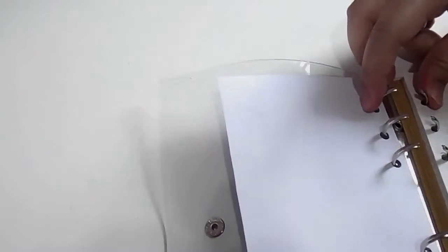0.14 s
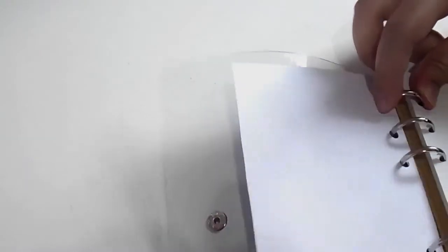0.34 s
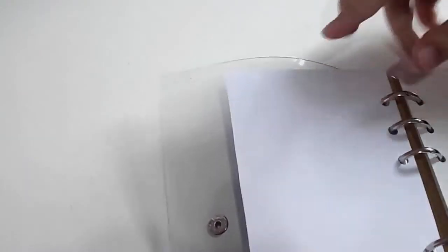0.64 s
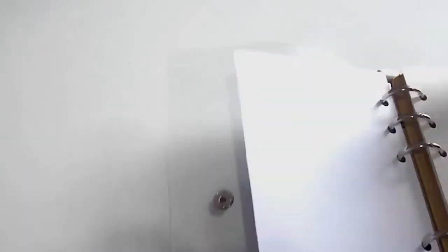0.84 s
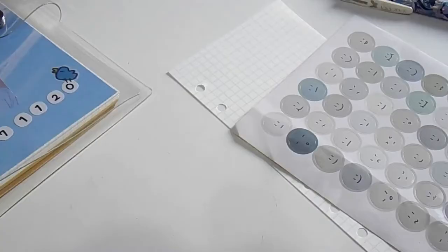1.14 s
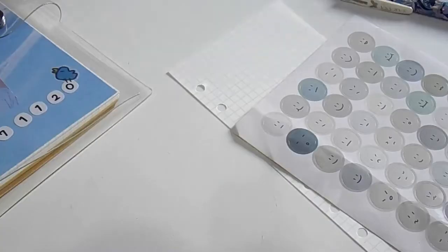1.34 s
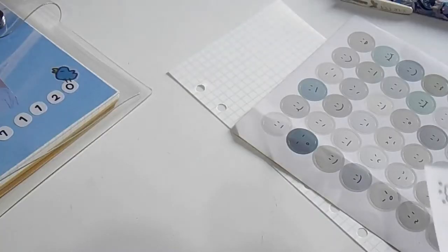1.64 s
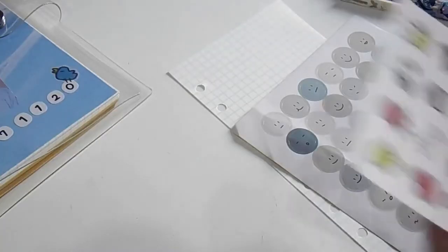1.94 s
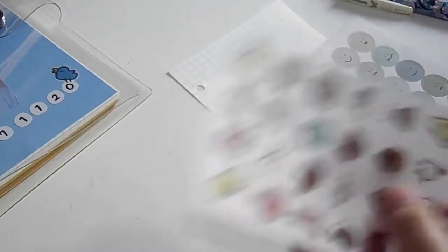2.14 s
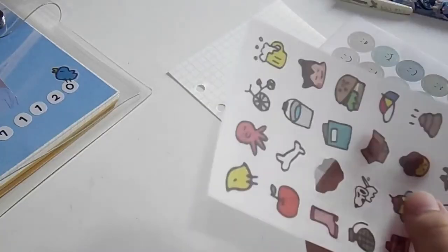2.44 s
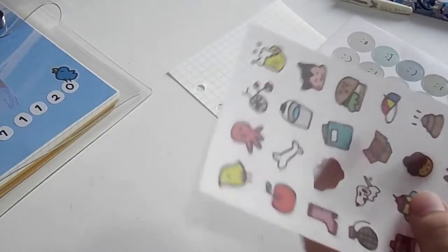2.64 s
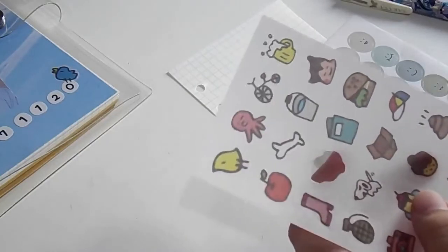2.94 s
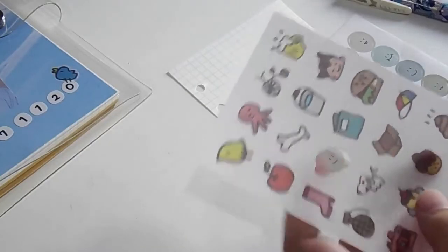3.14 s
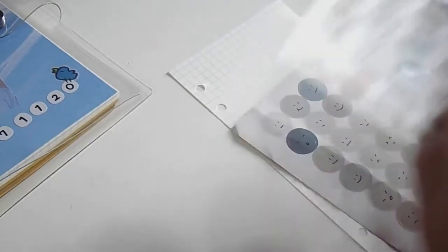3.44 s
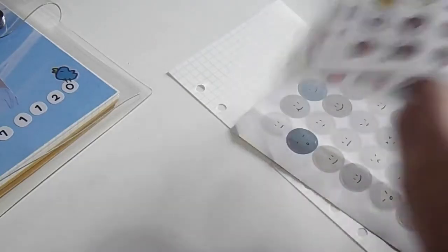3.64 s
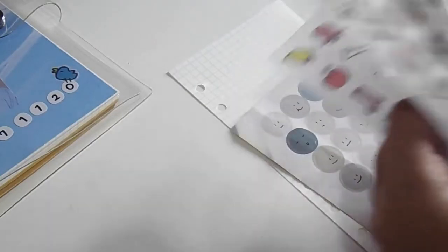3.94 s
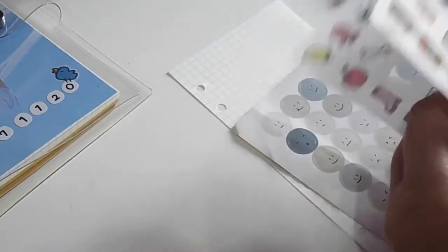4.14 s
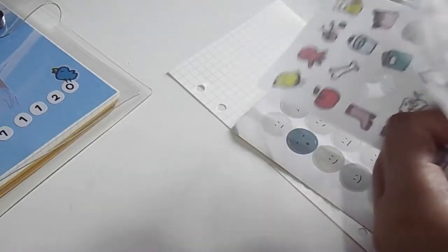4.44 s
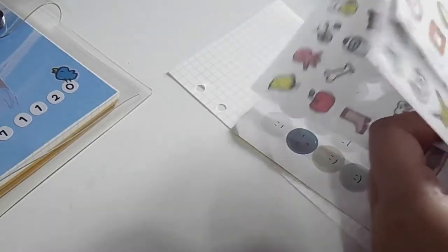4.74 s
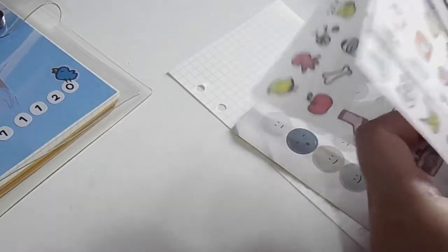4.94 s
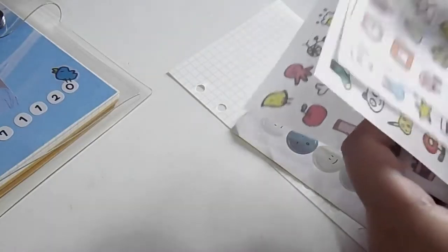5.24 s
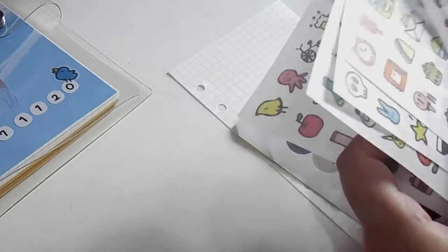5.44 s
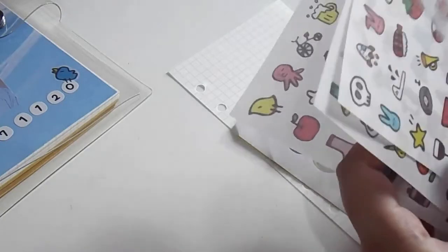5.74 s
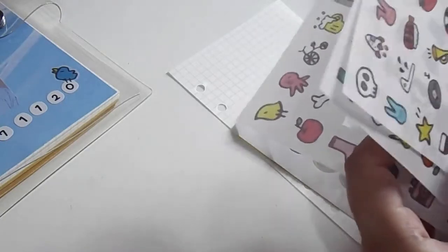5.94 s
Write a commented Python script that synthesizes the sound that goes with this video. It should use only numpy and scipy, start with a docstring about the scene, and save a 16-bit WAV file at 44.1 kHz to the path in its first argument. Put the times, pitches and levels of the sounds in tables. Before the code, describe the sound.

In a small, hard-walled room, a ring binder closes right next to the microphone with a loud, slightly overloaded metal snap that rings for a moment. Everything after it is much quieter: stiff sticker sheets tap lightly on the desk, pop as they bend and rub against one another with a soft rustle. A low, steady room hiss lies underneath.

```python
"""The steel rings of a binder snap shut on a desk, close to the microphone, in a small hard room.
The ring halves strike, rebound and shake their spring plate, loud enough to overload the input;
the cover slaps the desk, and steel and room ring on. Then plastic sticker sheets are picked up,
flexed and slid over each other: faint taps, clacks and swishes of friction over the room's hush."""
import sys
import numpy as np
from scipy import signal
from scipy.fft import rfft, irfft, next_fast_len
from scipy.io import wavfile

SR = 44100
rng = np.random.default_rng(int(sys.argv[2]) if len(sys.argv) > 2 else 0)


def digitize_waveform(pressure):
    """Quantize a signal to 16-bit integers and store it at the path in sys.argv[1].

    Rows of a 2-D input are taken as channels; values are limited to [-1, 1].
    """
    field = np.atleast_2d(pressure).T
    bounded = np.clip(field, -1, 1)
    quanta = np.round(bounded * 32767).astype(np.int16)
    wavfile.write(sys.argv[1], SR, quanta)


N = 268548
SNAP_S = .2064  # the rings hit home


def amp(db):
    """Decibels to gain."""
    return 10 ** (np.asarray(db) / 20)


def unit(x):
    """x at rms 1."""
    return x / np.sqrt(np.mean(x ** 2) + 1e-20)


def along(points, hz):
    """A curve of (frequency, value) points, read at hz on a log axis."""
    freqs, values = np.transpose(points)
    return np.interp(np.log(hz + 1), np.log(freqs), values)


def filtered(x, response):
    """x through a filter given as a complex function of frequency."""
    size = next_fast_len(len(x) + SR // 4)
    return irfft(rfft(x, size) * response(np.fft.rfftfreq(size, 1 / SR)), size)[:len(x)]


def resonance(f, hz, width):
    """Response of one damped mode."""
    return 1j * f * width / (hz * hz - f * f + 1j * f * width)


def band(count, hz, spread):
    """Noise of rms 1 in a steep-sided band around hz, spread times its pitch wide."""
    def response(f):
        detuning = (f * f - hz * hz) / (f * hz * spread + 1)
        return (1 + detuning ** 6) ** -.5
    return unit(filtered(rng.standard_normal(count), response))


def flicker(t, depth_db, rate_hz):
    """An unsteady gain of rms 1 that glides to a new random level rate_hz times a second."""
    knots = rng.standard_normal(int(t[-1] * rate_hz) + 2)
    return unit(amp(depth_db * np.interp(t * rate_hz, np.arange(len(knots)), knots)))


def ringing(modes, attack_s, count=SR):
    """The decaying modes of a struck body, scaled to energy 1."""
    t = np.arange(count) / SR
    tones = sum(amp(db - 60 * t / t60) * np.sin(2 * np.pi * (hz * t + rng.random()))
                for hz, db, t60 in modes)
    tones *= (1 - np.exp(-t / attack_s)) ** 2
    return tones / np.linalg.norm(tones)


def add(track, start_s, sound):
    """Mix a sound into the track at start_s."""
    part = track[max(round(start_s * SR), 0):][:len(sound)]
    part += sound[:len(part)]


def hush(air_db):
    """Room tone: steady air noise and a faint wavering drone, with the microphone's hiss."""
    # tones of the room's drone: pitch_hz, level_db
    hum = [(100, -90), (156, -85), (196, -86), (506, -79), (622, -78)]
    # spectrum of room air and microphone hiss: frequency_hz, gain_db
    air_colour = [(18, -63), (30, -41.5), (90, -12), (187, -12), (307, -7), (420, -4.5), (479, -4),
                  (622, -1.5), (691, -4.5), (767, -2.5), (1050, -6), (1290, -7.5), (4310, -14),
                  (4780, -14.5), (15500, -20)]
    t = np.arange(N) / SR
    drone = sum(amp(db) * np.sqrt(2) * np.sin(2 * np.pi * hz * t) * flicker(t, depth_db=5, rate_hz=10)
                for hz, db in hum)
    air = unit(filtered(rng.standard_normal(N), lambda f: amp(along(air_colour, f))))
    return drone + amp(air_db) * air


def contacts(flight_s=.0124, shrink=.72, loss_db=1.9):
    """The ring halves meet, then rebound ever faster and weaker: rows of start_s, blow_db, scrape_db."""
    snap_db, rebound_db = 8, 3.5
    lead_s, lead_db = .0029, -8  # one pair of rings touches a little ahead of the rest
    rows = []
    for bounce in range(5):
        start_s = SNAP_S + flight_s * (1 - shrink ** bounce) / (1 - shrink)
        blow_db = rebound_db - loss_db * (bounce - 1) if bounce else snap_db
        scrape_db = .5 - 5.5 * bounce  # the grit of the tips fades faster than the blows
        rows.append((start_s - lead_s, blow_db + lead_db, scrape_db + lead_db))
        rows.append((start_s, blow_db, scrape_db))
    return rows


def rings(plate_db, scrape_t60, chatter_db, chatter_t60):
    """Each contact is a sharp blow with a gritty scrape; the spring plate buzzes briefly after it."""
    # broad resonances of the rings and their spring plate: pitch_hz, width_hz, gain_db
    plate_modes = [(956.5, 380, -9.5), (2646, 420, 2.5), (3145, 480, 3.5), (4500, 500, -20),
                   (5570, 800, -9), (7650, 1500, -19.5), (10500, 3500, -26), (14000, 2500, -31)]
    blows, grit = np.zeros(N), np.zeros(N)
    t = np.arange(SR // 8) / SR
    for start_s, blow_db, scrape_db in contacts():
        blow = amp(chatter_db - 60 * t / chatter_t60) * rng.standard_normal(len(t))
        blow[0] += 1  # the impact itself
        add(blows, start_s, amp(blow_db) * blow)
        add(grit, start_s, amp(scrape_db - 60 * t / scrape_t60) * band(len(t), hz=10000, spread=3.7))

    def plate(f):
        return sum((-1) ** k * amp(db) * resonance(f, hz, width)
                   for k, (hz, width, db) in enumerate(plate_modes))
    return amp(plate_db) * filtered(blows, plate) + grit


def room(build_s, colour):
    """The walls' diffuse tail: it swells over build_s, then each frequency dies at its own speed."""
    # reverberation time of the small room: frequency_hz, t60_s
    decay_times = [(150, .42), (500, .52), (1400, 0.5), (2900, 0.55), (6000, 0.46), (10000, .4),
                   (15000, 0.22)]
    hz, t, spectra = signal.stft(rng.standard_normal(SR), SR, nperseg=256)
    decay = amp(-60 * t / along(decay_times, hz)[:, None])
    tail = signal.istft(spectra * decay, SR, nperseg=256)[1][:SR]
    swell = 1 - np.exp(-(np.arange(SR) / SR / build_s) ** 2)
    return swell * filtered(tail, lambda f: amp(along(colour, f))) / np.linalg.norm(swell * tail)


def afterring(steel_db, room_db):
    """The hardest contact leaves the closed rings singing and fills the room."""
    # thin lasting tones of the closed rings and the spine: pitch_hz, level_db, t60_s
    steel_modes = [(2378, -4, .38), (2452, -3, .38), (2641, 1, .33), (2748, -1, .42), (2847, -2, .56),
                   (2971, -2, .5), (2993, -2, .46), (3104, -2, .48), (3381, 0, .34), (3594, -7, .35),
                   (4694, -8, .46), (5755, -7, .42), (5938, -8, .43), (6368, -10, .45), (6730, -11, .38)]
    # colour of the snap as the walls return it: frequency_hz, gain_db
    echo_colour = [(30, -43.5), (140, -41), (250, -29.5), (350, -17.5), (620, -16), (980, -7.5),
                   (1200, -13.5), (1900, -16), (2400, -6.5), (2680, -2), (3000, -2), (3400, -7),
                   (3800, -16), (5000, -14), (5800, -7.5), (6500, -12.5), (7200, -17.5), (11000, -14.5),
                   (15500, -19.5)]
    out = np.zeros(N)
    add(out, SNAP_S, amp(steel_db) * ringing(steel_modes, attack_s=.005))
    add(out, SNAP_S, amp(room_db) * room(build_s=.026, colour=echo_colour))
    return out


def cover(start_s, slap_db, hollow_db):
    """The recoil slaps the binder's cover on the desk: a short knock and a hollow ring."""
    # knock of the cover landing flat: pitch_hz, level_db, t60_s
    slap_modes = [(454.2, -1.5, .024), (1010, -2, .028)]
    # hollow modes of the cover and the desk under it: pitch_hz, level_db, t60_s
    hollow_modes = [(197, -16, .3), (288, -3, .3), (316, 0, .3), (342, -5, .3), (437, 0, .4), (947, 3, .34),
                    (1026, 4, .34)]
    out = np.zeros(N)
    add(out, start_s, amp(slap_db) * ringing(slap_modes, attack_s=.002))
    add(out, start_s, amp(hollow_db) * ringing(hollow_modes, attack_s=.004))
    return out


def clack(hz, t60, spread, edge_db):
    """A stiff sheet clacks and crackles at its own pitch, with a short tick of its edge."""
    t = np.arange(SR // 6) / SR
    body = band(len(t), hz, spread) * flicker(t, depth_db=.5, rate_hz=890) * amp(-60 * t / t60)
    edge = band(len(t), hz=6400, spread=1.0) * amp(edge_db - 60 * t / .029)
    return body + edge


def thud():
    """The desk's dull answer to a light touch."""
    # short modes of the desk top: pitch_hz, level_db, t60_s
    desk_modes = [(368, -9, 0.027), (501, -3.5, 0.022), (647, -5, 0.017), (1146, -5.5, 0.015)]
    return ringing(desk_modes, attack_s=.001, count=SR // 6)


def taps(desk_db, edge_db, edge_loss):
    """Sheets tapped on the desk: the flatter they land, the more thud and the less edge in the clack."""
    # landings of a sheet: start_s, level_db, pitch_hz, thud_db
    landings = [(0.9252, -42.5, 1100, -9), (1.389, -45.5, 2000, -22), (1.7356, -45.5, 2400, -9),
                (2.873, -42.5, 630, -2), (4.0588, -41, 1900, -4.5), (4.064, -45, 2800, -19),
                (5.006, -50, 700, 3), (5.0595, -42.5, 1980, -0.5), (5.3809, -48, 1009, -10),
                (5.4572, -44.5, 2160, 1.5), (5.4717, -50, 2400, -6)]
    out = np.zeros(N)
    for start_s, db, hz, thud_db in landings:
        sheet = clack(hz, t60=.027, spread=.95, edge_db=edge_db - edge_loss * thud_db)
        add(out, start_s, amp(db) * (sheet + amp(desk_db + thud_db) * thud()))
    return out


def slides(hiss_hz, grain_db, grain_hz, rise_share=.42):
    """Friction between sheets: tiny slips that swell and fade with each unsteady stroke."""
    # strokes of one sheet over another: fastest_s, length_s, level_db, hiss_db
    strokes = [(1.128, 0.14, -61.5, -0.5), (1.408, 0.026, -53, -3), (2.227, .06, -65, -1),
               (2.496, 0.051, -64, 6.5), (2.78, 0.16, -76, 13.5), (2.938, 0.18, -66, 4),
               (3.496, .055, -63.5, 6.5), (3.645, 0.099, -60.5, -4), (3.724, 0.069, -63.5, 5.5),
               (3.922, 0.057, -58, -1), (4.05, .34, -61, -7.5), (4.263, .13, -58.5, -2.5),
               (4.418, .11, -57.5, -0.5), (4.505, .15, -58, -3.5), (4.614, .07, -51.5, -1),
               (5.015, 0.055, -59, -2), (5.556, 0.26, -66, 6.5), (5.752, 0.083, -65, 3),
               (5.922, 0.062, -61.5, 0)]
    out = np.zeros(N)
    for fastest_s, length_s, db, hiss_db in strokes:
        t = np.arange(int(length_s * SR)) / SR
        rise_s = length_s * rise_share
        speed = np.sin(np.pi / 2 * np.interp(t, [0, rise_s, length_s], [0, 1, 0])) ** .98
        rub_hz = 3400 * 2 ** ((db + 61.5) / 10)  # brisker is louder and higher: an octave per 10 dB
        rub = band(len(t), rub_hz, spread=1.04) + amp(hiss_db) * band(len(t), hiss_hz, spread=1.0)
        stick_slip = flicker(t, grain_db, grain_hz) * flicker(t, depth_db=2.2, rate_hz=60)
        add(out, fastest_s - rise_s, amp(db) * speed * stick_slip * rub)
    return out


def rustle(start_s, end_s, level_db, hz, crinkle_db, crinkles=14):
    """Sheets held in the hand: a soft unsteady rustle with a few faint crinkles at random."""
    out = np.zeros(N)
    t = np.arange(int((end_s - start_s) * SR)) / SR
    handling = signal.windows.tukey(len(t), .2) * flicker(t, depth_db=4.5, rate_hz=5.3)
    add(out, start_s, amp(level_db) * handling * band(len(t), hz, spread=1.06))
    for when, softness, pitch in rng.random((crinkles, 3)):
        crinkle = clack(hz=1810 * 2 ** (2 * pitch), t60=.018, spread=1.05, edge_db=-6)
        add(out, start_s + when * (end_s - start_s), amp(crinkle_db - 5.4 * softness) * crinkle)
    return out


def ticks():
    """The edge of one sheet flicks past another: very short, bright clacks."""
    # flicks of an edge: start_s, level_db
    flicks = [(1.9752, -46), (2.051, -50), (2.0754, -43), (2.878, -38), (2.882, -36), (3.9426, -63)]
    out = np.zeros(N)
    for start_s, db in flicks:
        add(out, start_s, amp(db) * clack(hz=5770, t60=.012, spread=.5, edge_db=-8.5))
    return out


def buckles(thud_db):
    """Flexed sheets pop through: a longer clack that barely reaches the desk."""
    # pops of a buckling sheet: start_s, level_db, t60_s
    pops = [(2.229, -51.5, 0.042), (2.6012, -38.5, 0.12), (2.9795, -43.5, 0.11), (3.0122, -43.5, 0.032),
            (3.507, -46, 0.067), (3.659, -52, 0.12), (3.741, -51.5, 0.1), (4.0288, -45, .03),
            (4.119, -52, 0.043)]
    out = np.zeros(N)
    for start_s, db, t60 in pops:
        sheet = clack(hz=1810, t60=t60, spread=1.1, edge_db=-6.5)
        add(out, start_s, amp(db) * (sheet + amp(thud_db) * thud()))
    return out


def squeaks(spread):
    """Faint narrow rasps where one glossy sheet catches on another."""
    # drags of a sheet: start_s, length_s, pitch_hz, level_db
    drags = [(4.351, 0.16, 4150, -61), (4.448, 0.15, 3920, -61), (4.757, 0.1, 4100, -64),
             (4.815, 0.027, 2880, -63)]
    out = np.zeros(N)
    for start_s, length_s, hz, db in drags:
        t = np.arange(int(length_s * SR)) / SR
        rasp = flicker(t, depth_db=-6, rate_hz=100) * band(len(t), hz, spread)
        add(out, start_s, amp(db) * np.sin(np.pi * t / length_s) * rasp)
    return out


def scene():
    """One microphone close to the desk: the snap, then the handling of the sheets, over room tone."""
    snap = rings(plate_db=16.5, scrape_t60=.007, chatter_db=-20.5, chatter_t60=.038)
    snap += afterring(steel_db=14, room_db=30)
    snap += cover(start_s=.2142, slap_db=6.0, hollow_db=2.5)
    clacks = taps(desk_db=20.0, edge_db=-18.5, edge_loss=.64) + buckles(thud_db=10.5) + ticks()
    sheets = amp(-1) * clacks + squeaks(spread=.19)
    sheets += slides(hiss_hz=9500, grain_db=2.0, grain_hz=560)
    sheets += rustle(start_s=1.4, end_s=4.7, level_db=-72.5, hz=1380, crinkle_db=-53.5)
    wall_colour = [(300, -9.5), (700, 0), (1300, -3.5), (5000, -13), (14000, -5)]  # frequency_hz, gain_db
    reverb = signal.fftconvolve(sheets, room(build_s=.002, colour=wall_colour))[:N]
    low_cut = signal.butter(4, 205, "highpass", fs=SR, output="sos")  # the desk sounds carry little below about 200 Hz
    return (signal.sosfilt(low_cut, snap + sheets + reverb) + hush(air_db=-58.5))[None]


def record(dry):
    """The snap overloads the input and clips; a steep filter cuts the highest treble."""
    top_hz = 15850
    band_limit = signal.ellip(12, .1, 85, top_hz, fs=SR, output="sos")
    return signal.sosfilt(band_limit, np.clip(dry, -1, 1))


dry = scene()
out = record(dry)
digitize_waveform(out)
```